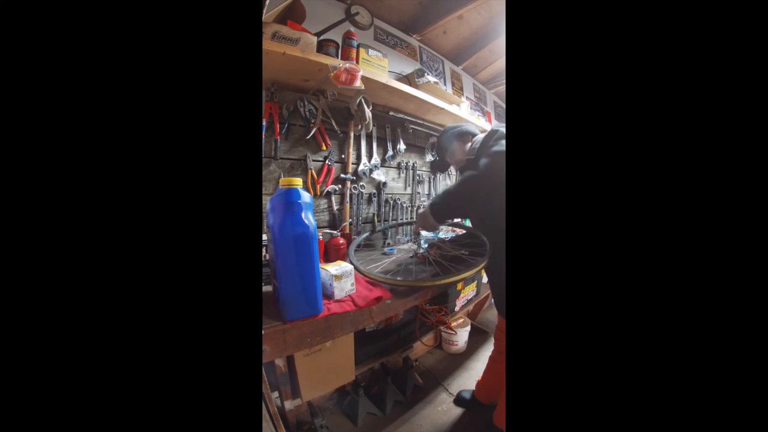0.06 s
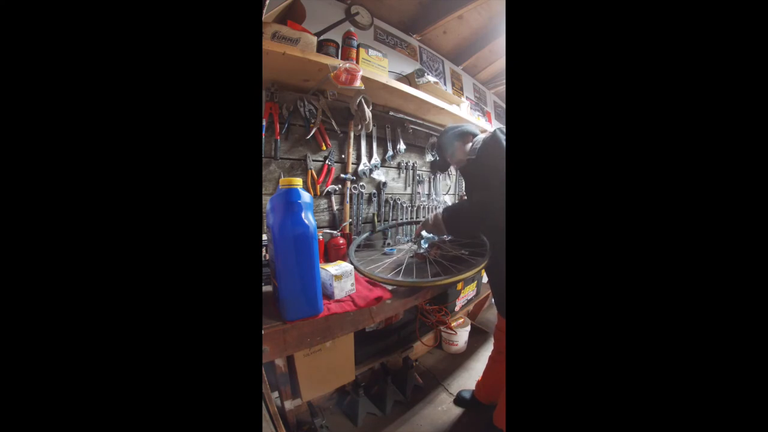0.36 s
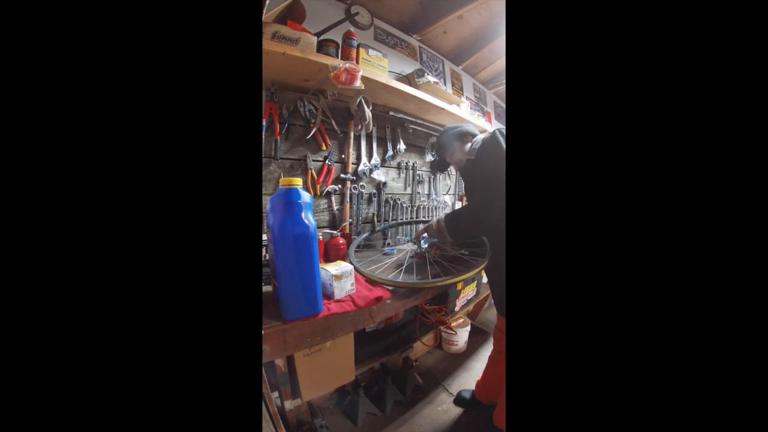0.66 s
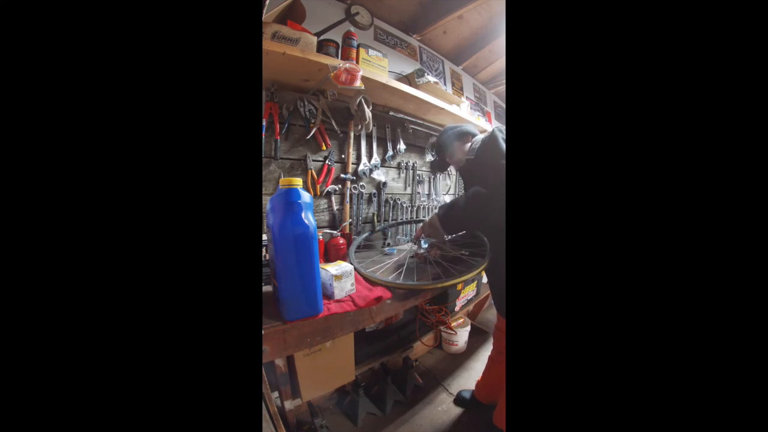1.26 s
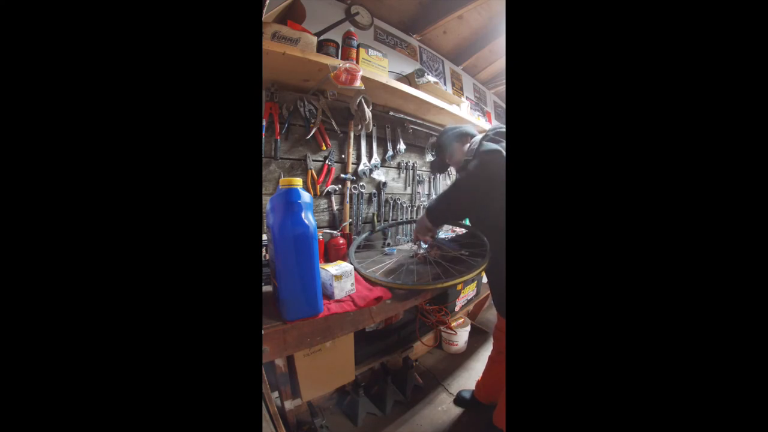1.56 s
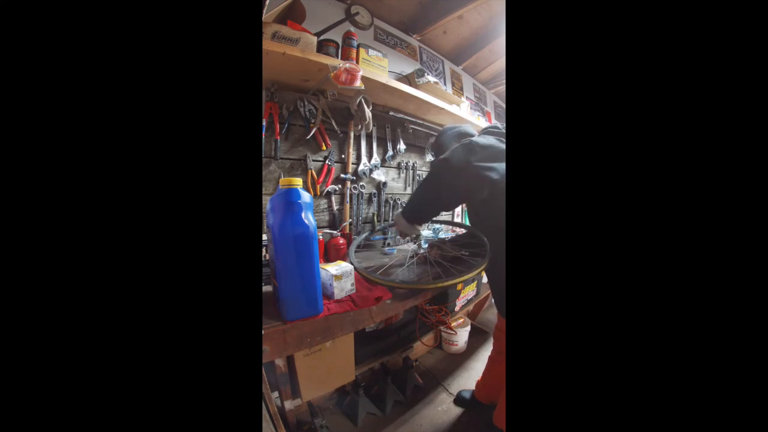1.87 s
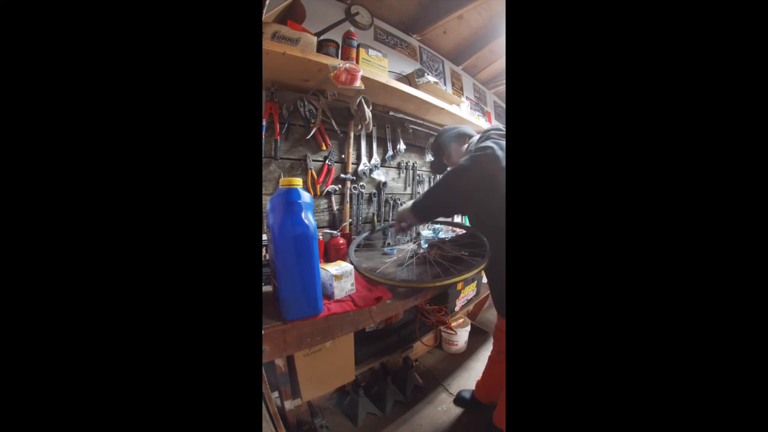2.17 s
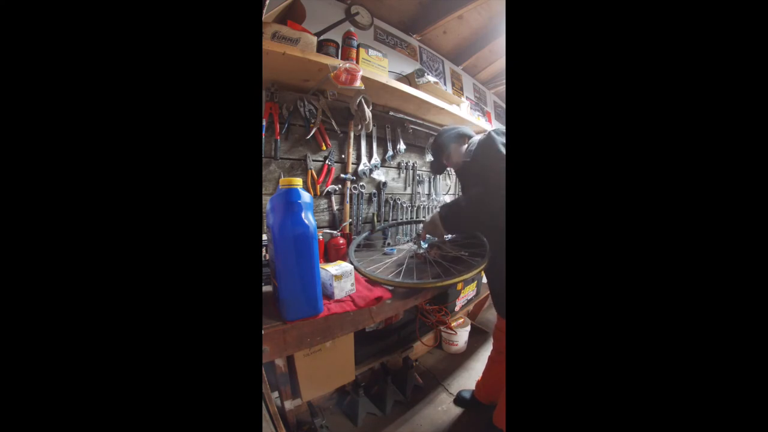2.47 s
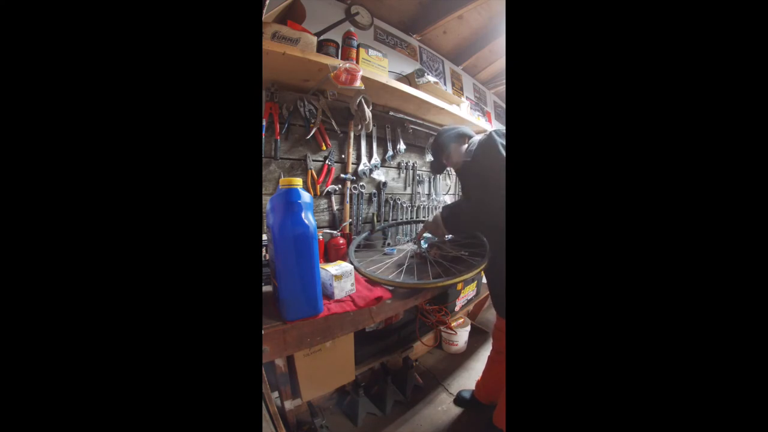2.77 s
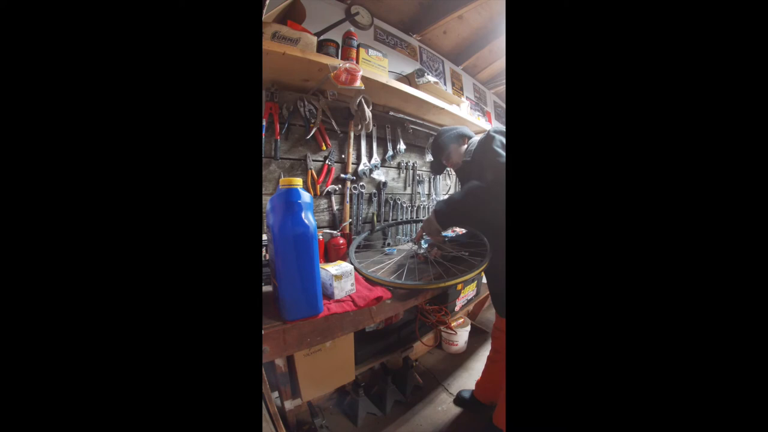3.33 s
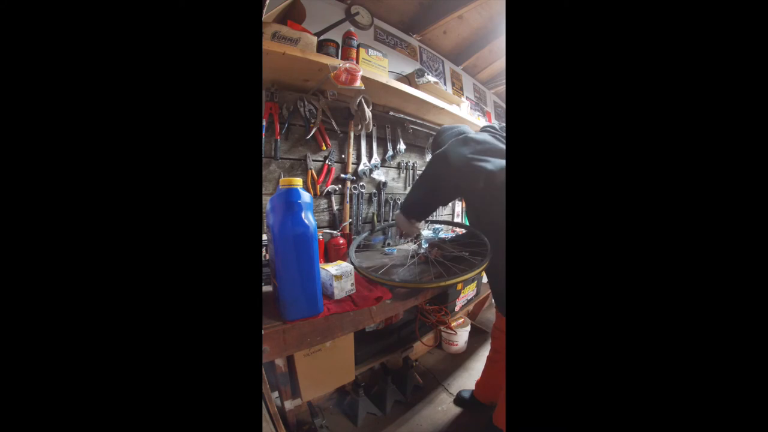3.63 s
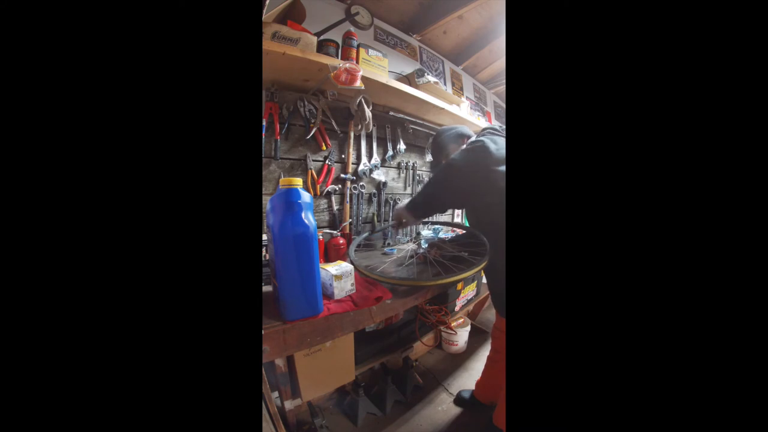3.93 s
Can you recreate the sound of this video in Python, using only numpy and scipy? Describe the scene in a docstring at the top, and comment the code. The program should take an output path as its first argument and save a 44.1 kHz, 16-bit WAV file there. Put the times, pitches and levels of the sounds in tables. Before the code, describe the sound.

Scattered sharp clinks of metal on a bicycle wheel echo briefly in a small workshop. Behind them a low engine hums through the walls and settles down, while the wheel bumps the bench softly and cloth rustles faintly.

```python
"""Metal parts click and clink against a bicycle wheel lying on the bench of a small workshop.
Each touch is a tiny burst of noise with an echo; most make the part ring, and the spokes ring faintly.
A sleeve rustles as its cloth slides, and the wheel bumps the bench. A low hum, probably an
eight-cylinder engine outside, comes through the walls and sinks to idle."""
import sys
import numpy as np
from scipy import signal
from scipy.fft import rfft, irfft
from scipy.io import wavfile
from scipy.ndimage import uniform_filter1d

SR = 44100
rng = np.random.default_rng(int(sys.argv[2]) if len(sys.argv) > 2 else 0)


def materialize(psi):
    """Save the field psi as 16-bit PCM at rate SR to the path in sys.argv[1].

    A 1-D psi becomes a single channel; in a 2-D psi each row is a channel.
    """
    bounded = np.clip(np.atleast_2d(psi).T, -1, 1)
    quanta = np.round(bounded * 32767).astype(np.int16)
    wavfile.write(sys.argv[1], SR, quanta)


N = 176400
T = np.arange(N) / SR


def undb(db):
    """Turn decibels into a number to multiply a sound by."""
    return 10 ** (np.asarray(db) / 20)


def curve(rows):
    """Join (time_s, value) points with straight lines, one value per sample."""
    rows = np.array(rows)
    return np.interp(T, rows[:, 0], rows[:, 1])


def on_log(hz, points):
    """Read between (pitch_hz, value) points, giving every octave the same width."""
    points = np.array(points)
    return np.interp(np.log(hz + 1), np.log(points[:, 0]), points[:, 1])


def drift(rate_hz):
    """A smooth random wobble, about 1 in size."""
    span = int(SR / rate_hz)
    steps = np.repeat(rng.standard_normal(N // span + 2), span)
    return np.sqrt(2) * uniform_filter1d(uniform_filter1d(steps, span), span)[:N]


def noise(colour):
    """Noise of strength 1, its tone shaped by (pitch_hz, level_db) points."""
    gain = undb(on_log(np.fft.rfftfreq(N, 1 / SR), colour))
    x = irfft(rfft(rng.standard_normal(N)) * gain, N)
    return x / x.std()


def shape_tone(x, db):
    """Turn each pitch up or down without any ringing before the sound starts."""
    cepstrum = irfft(np.log(undb(db)))
    cepstrum[1:len(x) // 2] *= 2
    cepstrum[len(x) // 2 + 1:] = 0
    return irfft(rfft(x) * np.exp(rfft(cepstrum)))


def add(out, start_s, x):
    """Mix a sound in at its start time."""
    i = int(start_s * SR)
    out[i:i + len(x)] += x[:N - i]


def engine(waver_db=3, waver_rad=0.33):
    """Tones at multiples of the engine's speed, muffled by walls; four swell and fade in the room."""
    # engine speed: time_s, cycles_per_s
    speeds = [(0, 13.76), (.3, 14), (.7, 14.1), (1.32, 14.24), (1.53, 13.4), (1.74, 12.73), (2.15, 12.75),
              (2.4, 11.3), (2.65, 10.93), (3.55, 11.1), (3.9, 9.66)]
    # the four booming tones: multiple of the engine's speed
    boom_multiples = (5, 8, 13, 16)
    # one loudness curve per booming tone: time_s, level_db
    boom_levels = [
        [(0, -31.5), (1.0, -31), (1.35, -36.5), (1.5, -28.5), (1.78, -22), (2.0, -27), (2.15, -43),
         (2.28, -30.5), (2.38, -42), (2.5, -34), (3.19, -38), (3.38, -73), (3.62, -39), (3.82, -38), (4, -60)],
        [(.08, -23.5), (.75, -31.5), (1.02, -25.5), (1.37, -27), (2.0, -41.5), (2.3, -57), (2.98, -40.5),
         (3.25, -66), (3.4, -47), (3.82, -41), (3.98, -52)],
        [(0, -52.5), (2.45, -59), (2.7, -49), (3.18, -44), (3.35, -83)],
        [(0, -48), (1.1, -67), (2.6, -56), (2.9, -46), (3.2, -44.5), (3.6, -64.5)],
    ]
    # the weaker tones, lowest first: loaded_db, idle_db
    weak_levels = [(-50.5, -60), (-58, -55), (-45, -52), (-44, -57), (-54.5, -56.5), (-44, -54), (-59, -70),
                   (-50, -60), (-61.5, -69.5), (-52.5, -63.5), (-65.5, -68.5), (-65, -68.5), (-78.5, -63.5),
                   (-70.5, -71)]
    # tone of the rumble: pitch_hz, level_db
    rumble_colour = [(25, -7), (60, 1.5), (190, -7), (260, -12.5), (400, -30), (1500, -59)]
    # loudness of the rumble: time_s, level_db
    rumble_levels = [(1.9, -52), (2.1, -46.5), (2.5, -50), (3.5, -50), (3.85, -49)]
    speed = curve(speeds)
    phase = 2 * np.pi * np.cumsum(speed) / SR
    load = (speed - speed.min()) / np.ptp(speed)  # 0 at idle, 1 at the fastest
    hum = np.zeros(N)
    for k, levels in zip(boom_multiples, boom_levels):
        hum += undb(curve(levels)) * np.sin(k * phase + 2 * np.pi * rng.random())
    weak_multiples = [k for k in range(2, 2 * len(weak_levels)) if k not in boom_multiples]
    for k, (loaded_db, idle_db) in zip(weak_multiples, weak_levels):
        db = idle_db + load * (loaded_db - idle_db) + waver_db * drift(4.51)
        hum += undb(db) * np.sin(k * phase + waver_rad * drift(7) + 2 * np.pi * rng.random())
    rumble = noise(rumble_colour) * undb(curve(rumble_levels))
    return np.sqrt(2) * hum + rumble


def air():
    """The faint background hush of the workshop."""
    # tone of the hush: pitch_hz, level_db
    colour = [(300, 1.5), (780, -6), (1100, -9), (2000, -12), (4000, -25), (7000, -26), (9900, -29),
              (11300, -47.5), (14000, -68)]
    # its loudness: time_s, level_db
    levels = [(1.0, -57.5), (1.35, -61), (3.3, -63), (3.7, -59.5)]
    return noise(colour) * undb(curve(levels))


def contact(rise_s, hold_s, low_db, size=32768):
    """A brief gritty chatter, then the wheel's many close notes and the room's echo."""
    # workshop echo: pitch_hz, fade_s (time to fall 60 dB), level_db (relative to the click)
    room = [(600, 1, -4.5), (1800, 0.73, -2.5), (3680, 0.47, -7), (6500, 0.39, -10.5), (10000, 0.39, -10),
            (14000, .24, -10)]
    grit_db, chatter_fade_s = 0.5, 0.071
    note_gap_hz, note_share = 84.7, 0.63  # the wheel's notes: average spacing, share of the echo
    t, hz = T[:size], np.fft.rfftfreq(size, 1 / SR)
    grit = rng.standard_normal(size) * undb(grit_db * rng.standard_normal(size).clip(-2, 2))
    fade = undb(-60 * np.maximum(t - hold_s, 0) / chatter_fade_s)
    chatter = grit / grit.std() * np.minimum(t / rise_s, 1) * fade
    sound = shape_tone(chatter, on_log(hz, [(2000, low_db), (3300, 0)]))
    note_chance = hz[1] / note_gap_hz
    is_note = rng.random(len(hz)) < note_chance
    power = 1 - note_share + note_share * is_note / note_chance
    echo_spectrum = np.sqrt(size * power) * np.exp(2j * np.pi * rng.random(len(hz)))
    room_hz = np.array(room)[:, 0]
    for this_band, (_, fade_s, db) in zip(np.eye(len(room)), room):
        echo = irfft(echo_spectrum * on_log(hz, np.c_[room_hz, this_band]))
        sound += echo * undb(db - 60 * t / fade_s) * (1 - np.exp(-t / 0.01))
    return sound, hz


def ring(hz, db, fade_s, spread, count=3):
    """Ringing metal: a few nearly equal pitches that pulse against each other as they fade."""
    t = T[:SR]
    pitches = hz * (1 + spread * rng.standard_normal((count, 1)))
    tones = np.sin(2 * np.pi * (pitches * t + rng.random((count, 1))))
    return undb(db - 60 * t / fade_s) * sum(tones) / np.sqrt(count)


def clicks():
    """Metal touches the wheel, ringing the spokes and, where one is named, the part in hand."""
    # touches, with relative levels near 2, 4, 7 and 10 kHz:
    # start_s, part, touch, low_db, mid_db, high_db, treble_db
    hits = [ (0.2464, "tool", "clack", -39.5, -42.5, -39, -40.5),
            (0.496, None, "snap", -75, -78, -61.5, -57.5), (.606, None, "snap", -82, -80, -69, -71),
            (0.742, None, "snap", -57.5, -60.5, -62, -65), (0.797, "axle", "scuff", -60, -61, -73, -69),
            (0.817, "axle", "scuff", -52.5, -58, -69, -58),
            (0.853, "axle", "snap", -48.5, -47.5, -45, -43.5),
            (0.989, "washer", "snap", -52, -49, -45, -44), (1.414, None, "snap", -76, -78, -64, -59.5),
            (1.532, "cone", "scuff", -53.5, -64, -66, -77), (1.557, "cone", "snap", -42, -49, -57, -60),
            (1.586, "cone", "snap", -57, -66, -59, -67), (1.606, "cone", "snap", -62.5, -69.5, -58, -71),
            (1.9273, "rim", "snap", -53.5, -47, -61, -73), (2.125, "hub", "snap", -59, -56.5, -58.5, -80),
            (2.4267, "socket", "snap", -42.5, -40.5, -33, -32),
            (2.6659, "nut", "snap", -49, -47, -47.5, -53.5), (2.828, "hub", "snap", -52, -53.5, -61.5, -61),
            (2.92, "hub", "scuff", -61.5, -60.5, -68, -72), (3.071, "hub", "scuff", -56.5, -56, -60.5, -63),
            (3.722, None, "snap", -58.5, -58, -83, -77), (3.771, "hub", "scuff", -55, -60, -63.5, -71)]
    # those four bands: width_hz
    band_widths = (1500, 2200, 3500, 2500)
    # edges of the bass, the four bands and the top, two each: pitch_hz
    edges = [500, 1100, 1450, 2500, 3400, 4400, 5600, 7800, 9200, 10300, 11600, 14500]
    # ways of touching: rise_s, hold_s, low_db (weakens the low notes of the first burst)
    touches = {"snap": (0.0011, 0.0014, 0), "clack": (0.0029, 0.0022, -8), "scuff": (0.0046, 0.0092, -1.5)}
    # notes each metal part rings at: pitch_hz, boost_db
    parts = { "tool": [(1720, 3.5), (3620, 6), (4258, 4), (6660, 10), (9020, 16.5), (9560, 11), (10830, 7)],
             "axle": [(1950, 13), (3010, 12), (4120, 6), (7400, 14.5), (10150, 6)], "washer": [(2980, 5.5),
             (3290, 8.5), (4330, 6.5), (7350, 6), (8900, 7.5)], "cone": [(2550, 2.5), (5260, 13),
             (6020, 12), (9500, 12.5)], "rim": [(1970, 8.5), (3000, 10.5), (3289, 6.5), (4280, 12.5)],
             "hub": [(2290, 6.5), (2620, 7)], "socket": [(1990, 5), (2550, 10.5), (3530, 8), (6700, 9),
             (8650, 6), (9850, 9)], "nut": [(3246, 6.5), (6880, 15), (8290, 11), (10080, 14), (13900, 12)]}
    # notes of the spokes: pitch_hz, level_db (relative to the hit's low_db), fade_s
    spokes = [(1216, -29, 2), (1374, -22.5, 2), (1670, -17.5, 0.92), (1946, -27.5, 1.2), (2556, -14, 0.64),
              (2965, -21.5, 0.8)]
    click_trim_db, bass_db, top_db = -2, -16, -15.5
    part_trim_db, sharpness, ring_db, ring_cycles = -2.5, 22.4, -28, 1150
    out = np.zeros(N)
    for start_s, part, touch, low_db, *upper_db in hits:
        burst, hz = contact(*touches[touch])
        # spread each band's level over its width
        bands = np.array([low_db, *upper_db]) + 10 * np.log10(SR / 2 / np.array(band_widths))
        edge_db = np.repeat([bands[0] + bass_db, *bands, bands[-1] + top_db], 2)
        tone_db = on_log(hz, np.c_[edges, edge_db])
        if part:
            tone_db += part_trim_db
            for pitch, boost_db in parts[part]:
                tone_db += boost_db / (1 + (2 * sharpness * (hz / pitch - 1)) ** 2)
            for pitch, _ in parts[part]:
                note_db = np.interp(pitch, hz, tone_db) + ring_db
                add(out, start_s, ring(pitch, note_db, ring_cycles / pitch, spread=0.006))
        add(out, start_s, shape_tone(burst, tone_db + click_trim_db))
        for pitch, level_db, fade_s in spokes:
            add(out, start_s, ring(pitch, low_db + level_db, fade_s, spread=0.0012))
    return out


def sleeve(rough_db=2.0):
    """Cloth slides unevenly as the arm reaches over the wheel."""
    # tone of the rustle: pitch_hz, level_db
    colour = [(800, -16), (1800, -6), (3400, 0.5), (5500, -6), (8000, -14.5), (9900, -5.5), (11000, -24),
              (14000, -51.5)]
    # its loudness: time_s, level_db
    levels = [(1.3, -76), (1.75, -74), (2.35, -66), (3.0, -71), (3.25, -75.5), (3.42, -65.5), (3.82, -67),
              (3.92, -73)]
    return noise(colour) * undb(curve(levels) + rough_db * drift(60))


def bumps(rise_s=0.0037, decay_s=0.012):
    """The wheel hits the bench with dull knocks that die away quickly."""
    # soft knocks: start_s, level_db, pitch_hz
    knocks = [(1.935, -57, 624), (2.045, -47, 496), (2.43, -50.5, 402), (3.08, -51, 615), (3.572, -46, 330),
              (3.725, -54, 700), (3.841, -37, 123)]
    out, t = np.zeros(N), T[:SR // 4]
    envelope = np.minimum(t / rise_s, 1) * np.exp(-t / decay_s)
    for start_s, db, hz in knocks:
        thud = noise([(hz / 6, -20), (hz / 1.4, -2), (hz * 1.19, 0), (hz * 2, -16), (hz * 8, -50)])
        add(out, start_s, undb(db) * thud[:len(t)] * envelope)
    return out


def scene():
    """All the sounds together in one channel."""
    return (clicks() + bumps() + engine() + sleeve() + air())[None]


def record(dry):
    """Cut away the very highest treble."""
    top_hz = 14600
    return signal.sosfilt(signal.ellip(8, .2, 70, top_hz, fs=SR, output="sos"), dry)


dry = scene()
out = record(dry)
materialize(out)
```